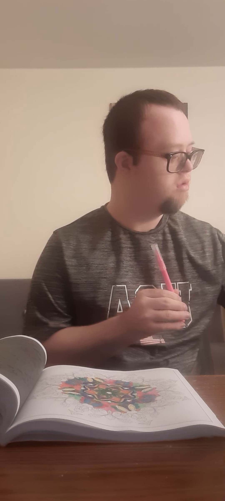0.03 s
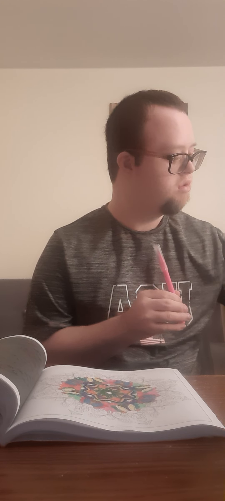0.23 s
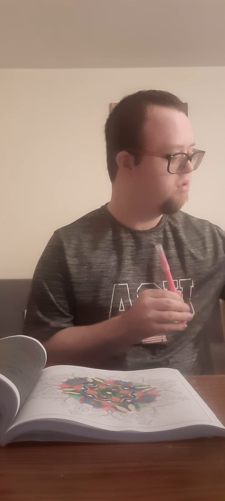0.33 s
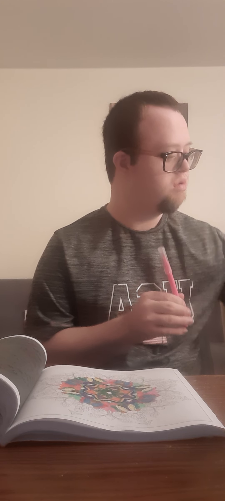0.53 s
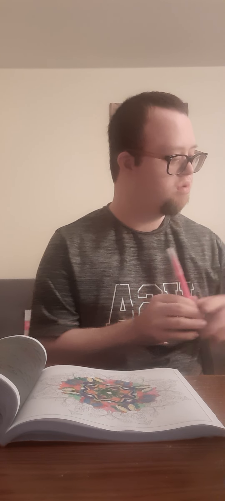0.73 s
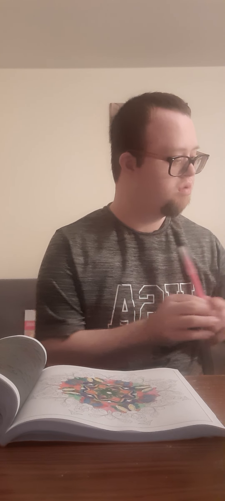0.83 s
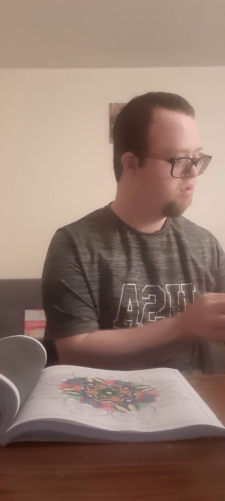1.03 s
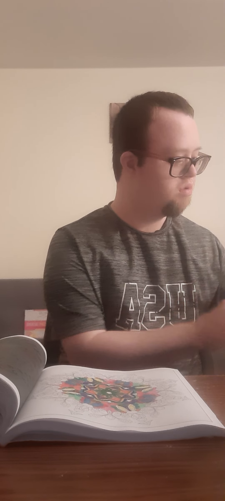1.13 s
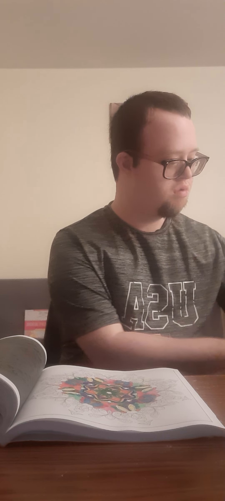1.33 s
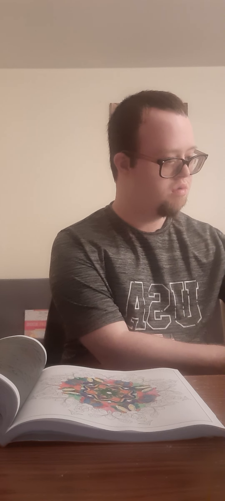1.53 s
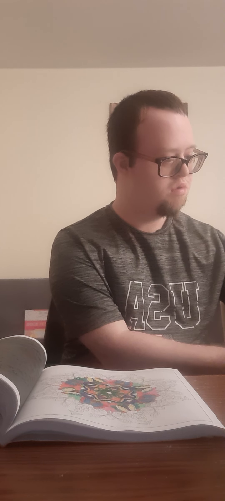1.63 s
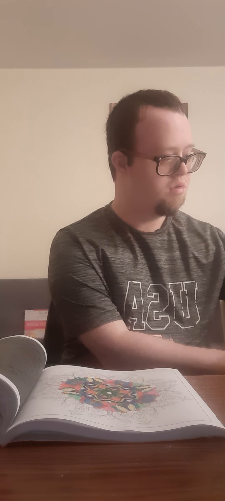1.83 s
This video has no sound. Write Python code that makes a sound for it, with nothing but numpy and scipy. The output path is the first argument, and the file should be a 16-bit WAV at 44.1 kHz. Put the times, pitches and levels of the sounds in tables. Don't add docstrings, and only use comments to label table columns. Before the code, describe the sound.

A plastic marker cap snaps loudly at about 0.23 and 0.25 seconds, a tight double click with a brief tap and woody knock. A tiny tick comes near 0.48, then faint sleeve rustle over low room hum. From 1.46 to 1.7 the marker is set down with quieter hollow plastic taps and dull table thumps; a last soft tap falls at 1.9. Small room, microphone on the table, slightly right-weighted knocks.

```python
import sys
import numpy as np
from scipy import signal
from scipy.fft import rfft, irfft, next_fast_len
from scipy.io import wavfile
from scipy.ndimage import map_coordinates

SR = 44100
rng = np.random.default_rng(int(sys.argv[2]) if len(sys.argv) > 2 else 0)


def pcm_store(signal):
    levels = np.round(np.clip(np.atleast_2d(signal), -1, 1) * 32767)
    wavfile.write(sys.argv[1], SR, levels.astype(np.int16).T)


def volts_from_decibels(level):
    exponent = np.asarray(level, float) / 20
    return 10 ** exponent


N = 83790
SIDE = np.array([[0.5], [-0.5]])


def unit(x):
    return x / np.sqrt(np.mean(x ** 2) + 1e-20)


def along(points, hz):
    f, v = np.transpose(points)
    return np.interp(np.log(hz + 1), np.log(f + 1), v)


def curves(rows):
    s, *columns = np.transpose(rows)
    return [np.interp(np.arange(N) / SR, s, column) for column in columns]


def wobble(rate):
    knots = rng.standard_normal(int(N * rate / SR) + 4)
    return map_coordinates(knots, [np.arange(N) * rate / SR])


def colour(x, points):
    m = 2 * next_fast_len(x.shape[-1] // 2 + 4096)
    gain = volts_from_decibels(along(points, np.fft.rfftfreq(m, 1 / SR)))
    cepstrum = irfft(np.log(gain), m)
    cepstrum[1:m // 2] *= 2
    cepstrum[m // 2 + 1:] = 0
    return irfft(rfft(x, m) * np.exp(rfft(cepstrum)), m)[..., :x.shape[-1]]


def add(track, s, x):
    part = track[..., round(s * SR):][..., :x.shape[-1]]
    part += x[..., :part.shape[-1]]


def room(x):
    # f/Hz, T60/s
    decay = [(60, 0.73), (300, 0.28), (900, 0.4), (1650, 0.57), (2800, 0.46), (5500, 0.43), (12000, 0.3)]
    wall_delay_s = 0.004
    hz, t, z = signal.stft(rng.standard_normal((2, SR * 3 // 4)), SR, nperseg=256)
    z = z * volts_from_decibels(-60 * t / along(decay, hz)[:, None])
    tail = signal.istft(z, SR, nperseg=256)[1]
    tail = tail / np.linalg.norm(tail[0])
    delayed = np.pad(x, (round(wall_delay_s * SR), 0))
    return signal.fftconvolve(delayed[None], tail, axes=1)


def contact_crackle(contacts, room_db):
    # f/Hz, level/dB
    plastic = [(150, -28), (400, -2), (900, 3), (2000, 0), (4000, -6.5), (6000, -7), (12000, 1),
               (16000, -17)]
    left_lag_s = 0.00053
    out, t = np.zeros((2, N)), np.arange(SR // 40) / SR
    for s, db, pan_db, ms, dull_db in contacts:
        u = t / (max(ms, 0.3) / 1000)
        shape = np.minimum(u * 5, 1) * np.exp(-2.5 * u ** 4)
        energy = np.linalg.norm(shape)
        spikes = rng.standard_normal((3, len(t))) * volts_from_decibels(4 * rng.standard_normal(len(t))) * shape
        spikes = spikes * energy / np.linalg.norm(spikes, axis=1, keepdims=True)
        tick = energy * (np.arange(len(t)) == 0)
        burst = colour(np.vstack([spikes, tick]), plastic)
        tilt = [(500, 2 * dull_db), (2000, 0.013), (16000, -3 * dull_db)]
        common, left_only, right_only, impulse = volts_from_decibels(db - 3.5) * colour(burst, tilt)
        add(out[0], s + left_lag_s, volts_from_decibels(pan_db / 2) * (0.55 * common + 1.8 * left_only))
        add(out[1], s, volts_from_decibels(-pan_db / 2) * (1.12 * common + 0.21 * right_only))
        add(out, s, volts_from_decibels(room_db) * room(impulse))
    return out


def snaps():
    # t/s, peak level/dB, left-right level/dB, crackle length/ms, dullness/(dB per octave)
    sharp = [
        (.2270, -8.5, -1, 2.8, -.5),
        (.2298, -9, 1, 1.5, .5),
        (.2308, -14, 3, 1.6, -2),
        (.2481, -7, -2, 2.2, 0),
        (.2499, -7, -1, 1.6, -.5),
        (.4842, -38, 1, 4, .5),
        (1.4794, -34, 3, 2.8, -2),
        (1.4822, -35, 4, 3.6, -3),
        (1.8972, -34, 1, 4, 2.5),
    ]
    return volts_from_decibels(5) * contact_crackle(sharp, room_db=-1.5)


def plastic_contacts():
    # t/s, peak level/dB, left-right level/dB, crackle length/ms, dullness/(dB per octave)
    taps = [(0.265, -6.5, -5, 1.9, 3.5), (1.019, -53, -6, 3.9, 5.5), (1.4631, -50.5, -4.5, 5, -1.5),
            (1.4875, -33, -12.5, 12, 4.5), (1.4932, -38, 6, 6.6, -4.5), (1.4985, -25.5, -7.5, 3.2, -1.5),
            (1.505, -34, 3, 4.8, 4), (1.522, -44, -7, 6, -4), (1.6013, -29, 10, 4.3, 9),
            (1.6045, -32, 4, 4.9, 8.5), (1.627, -49, 11, 6.2, -4.5), (1.6838, -32.5, -2.5, 2.5, 4.5),
            (1.6865, -41, 14, 4.5, 3), (1.853, -47, -3, 6.3, -1)]
    return contact_crackle(taps, room_db=3)


def table_top():
    # t/s, peak level/dB, softness/ms, main mode f/Hz, other modes level/dB
    blows = [(0.2301, -8, 3.8, 300.7, 2.5), (0.2496, -15.5, 3.2, 318, 6), (0.2676, -13, 2.6, 302, -5),
             (.292, -18.5, 4, 299.6, -18.5), (0.487, -39.5, 2.5, 314, -7), (1.372, -38, 4.6, 325, -6.5),
             (1.451, -41.5, 6, 290, -10), (1.464, -32, 6.6, 323, 2), (1.5013, -27, 4.6, 310, 0),
             (1.512, -23.5, 4.7, 308, 2), (1.544, -43.5, 4, 311, -24.5), (1.6039, -20, 2, 320, -6.5),
             (1.646, -50.5, 3, 303, 12), (1.689, -23, 4.6, 311, -7), (1.773, -35, 4.8, 300, -26),
             (1.834, -43.5, 9.8, 303, 6), (1.85, -41.5, 5.2, 317, 14), (1.876, -41.5, 4, 305.7, 11),
             (1.8975, -26.5, 2, 314.7, -6.5)]
    # f/Hz, level/dB, T60/s, left-right level/dB
    modes = [(172.8, -17.5, 0.12, -4.5), (211.3, -12.5, 0.14, -1), (262.4, -17.5, 0.25, -4),
             (495, -21.5, .08, -6), (755, -12.5, 0.041, -12), (801, -21, 0.14, -7.5), (1030, -21, 0.05, -1),
             (1181, -22.5, 0.12, -1.5), (1496, -28.5, 0.51, -0.5), (1655, -30.5, 0.16, 1),
             (2226, -29, .15, -1.5), (2940, -28, 0.21, 0)]
    main_t60_s, main_pan_db, room_db = 0.07, -8, -13.5
    out, t = np.zeros((2, N)), np.arange(SR // 3) / SR
    for s, db, soft_ms, hz, others_db in blows:
        luck = rng.standard_normal((len(modes), 3))
        rise = 1 - np.exp(-t / (max(soft_ms, 0.2) / 1000))
        ring = volts_from_decibels(main_pan_db * SIDE - 60 * t / main_t60_s) * np.sin(2 * np.pi * hz * t)
        for (f_hz, level_db, t60, pan_db), (a, b, c) in zip(modes, luck):
            softening_db = 0.75 * soft_ms * max(np.log2(f_hz / hz), 0)
            level_db = level_db + others_db + 2 * a - softening_db
            phase = 2 * np.pi * f_hz * (1 + 0.013 * b) * t + 2.39 * c * SIDE
            ring = ring + volts_from_decibels(level_db + pan_db * SIDE - 60 * t / t60) * np.sin(phase)
        ring = volts_from_decibels(db + 7.5) * rise * ring
        add(out, s, ring)
        add(out, s, volts_from_decibels(room_db) * room(ring[1]))
    return out


def sagging_modes(events):
    rise_turns, sag = 1.5, 0.2
    out, t = np.zeros((2, N)), np.arange(SR // 2) / SR
    for s, db, hz, t60 in events:
        turns = hz * (t - sag * t ** 2)
        swell = volts_from_decibels(db - 60 * t / t60) * (1 - np.exp(-t * hz / rise_turns))
        add(out, s, swell * np.sin(2 * np.pi * turns + [[1.2], [0]]) * [[0.6], [1.1]])
    return out


def barrel_knocks():
    # t/s, peak level/dB, f/Hz, T60/s
    knocks = [
        (.228, -20, 760, .04),
        (1.482, -37, 800, .04),
        (1.493, -29, 720, .07),
        (1.503, -33, 520, .05),
        (1.6025, -29, 1250, .02),
        (1.6835, -29, 760, .02),
    ]
    return sagging_modes(knocks)


def table_pushes():
    # t/s, peak level/dB, f/Hz, T60/s
    pushes = [
        (0.235, -23, 100.4, 0.32),
        (0.3, -34, 59.3, 0.61),
        (1.37, -30.5, 116, 0.19),
        (1.4, -35.5, 67.3, 0.34),
        (1.5, -24.5, 100, 0.35),
        (1.54, -34.5, 57.4, 0.82),
        (1.801, -31, 98, 0.36),
        (1.83, -37, 80.2, .4),
    ]
    return sagging_modes(pushes)


def sleeve():
    # t/s, rustle level/dB, brightness/dB
    strokes = [(0, -70, -15), (.2, -74, -18), (.45, -76, 12), (.55, -62.5, 3.5), (.72, -63, -1.5),
               (.82, -70, -2), (1.03, -70, 1), (1.15, -76.5, -5), (1.19, -71, 2), (1.26, -78, 1),
               (1.355, -78.5, 0), (1.385, -65.5, 1), (1.43, -76, 2), (1.55, -53, -8), (1.72, -71, 1),
               (1.845, -66, -14), (1.86, -62, -14.5), (1.9, -56, -12)]
    # f/Hz, level/dB
    cloth = [(300, -30), (1200, -8.5), (2600, -11.5), (3600, -9.5), (4500, -6), (5900, -3), (7700, 3.5),
             (12000, -3)]
    # f/Hz, level/dB
    dull = [(1200, -20.5), (2200, 0.5), (2700, -9), (3300, -5), (4000, -7), (5200, -14.5)]
    # f/Hz, level/dB
    to_left = [(2500, 5.5), (3100, 8.5), (3800, -4), (6400, -7), (7300, 5), (9200, 3.5), (11250, 2),
               (12000, -0.5)]
    to_right = [(3600, 1), (5350, -5), (5850, 2), (6500, -1.5), (7500, -0.5), (9600, 7), (11300, 1),
                (13000, -3)]
    # f/Hz, level/dB
    upper_limit = [(15650, 0), (15800, -30)]
    level_db, bright_db = curves(strokes)
    grain = rng.standard_normal((3, 2, N)) * volts_from_decibels(0.6 * wobble(60))
    body = unit(colour(grain[0], cloth))
    sheen_points = [(8000, -37.5), (10300, -2), (11400, 8), (13000, 4), (14300, 0), (15500, -16.5)]
    sheen = unit(colour(grain[1], sheen_points))
    shuffle = unit(colour(grain[2], dull))
    hiss = body + volts_from_decibels(bright_db + 1.0) * sheen + volts_from_decibels(-1.1 * bright_db - 14) * shuffle
    hiss = volts_from_decibels(level_db + 1.0) * hiss
    return colour(np.array([colour(hiss[0], to_left), colour(hiss[1], to_right)]), upper_limit)


def room_tone():
    # f/Hz, level/(dB per Hz)
    rumble = [(15, -64), (25, -43), (45, -17), (62, -13), (143, -6), (200, -16.5), (320, -7.5),
              (348, -17.5), (387, -9), (4000, -45.5), (5200, -85.5), (8800, -120)]
    # f/Hz, level/dB
    dips = [(500, 1), (680, -2.5), (1050, 1.5), (1900, -4)]
    # t/s, level/dB
    course = [(0.0, -45), (0.316, -40), (0.544, -47.5), (1.1, -50.5), (1.396, -48.5), (1.634, -42.5),
              (1.9, -42.5)]
    # f/Hz, bandwidth/Hz, level/dB, left-right level/dB
    hums = [(149.5, 9.5, -59.5, -1), (249.1, 31, -56.5, -4), (303.2, 46, -59.5, 5), (316.3, 17, -56, -8.5),
            (434.2, 4.7, -66, -1), (1000, 12, -79, 4)]
    level_db, = curves(course)
    a, b = rng.standard_normal((2, N))
    ports = np.array([a + 0.21 * b, a - 0.88 * b])
    out = volts_from_decibels(-56) * unit(colour(colour(ports, rumble), dips))
    f = np.fft.rfftfreq(N, 1 / SR)
    for hz, width_hz, db, pan_db in hums:
        resonance = 1 + ((f - hz) / width_hz * 2) ** 2
        a, b = irfft(rfft(rng.standard_normal((2, N))) / resonance, N)
        out = out + volts_from_decibels(db + pan_db * SIDE) * unit(np.array([a + 0.84 * b, a - 0.3 * b]))
    return volts_from_decibels(level_db - level_db.min() + 0.28 * wobble(5.2)) * out


def scene():
    contacts = snaps() + plastic_contacts()
    wood = table_top() + barrel_knocks() + table_pushes()
    return contacts + wood + sleeve() + room_tone()


def top_cut(x):
    return signal.sosfilt(signal.butter(12, 16780, fs=SR, output="sos"), x)


def record(dry):
    # f/Hz, level/dB
    left_port = [(40, -10.5), (90, -5), (3500, 4), (6500, 8), (8000, -7), (9050, -25), (10300, -11),
                 (16000, 0)]
    right_port = [(40, -3), (90, -1.5), (3500, -4), (5900, 14), (8200, -5.5), (9800, -29.5), (12000, -11),
                  (16000, -10)]
    # f/Hz, level/dB
    band_edge = [(22, -16), (45, 0), (14400, 0), (15400, -5), (16550, -8), (16780, -80)]
    ceiling = 0.9
    x = np.array([colour(dry[0], left_port), colour(dry[1], right_port)])
    x = x / (1 + np.abs(x / ceiling) ** 6) ** (1 / 6)
    return top_cut(colour(x, band_edge))


dry = scene()
out = record(dry)
pcm_store(out)
```